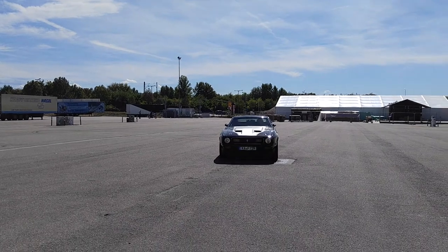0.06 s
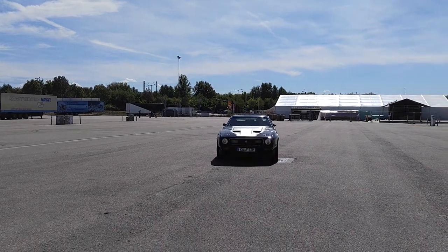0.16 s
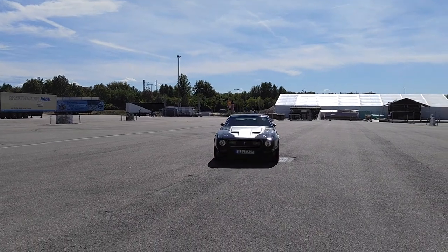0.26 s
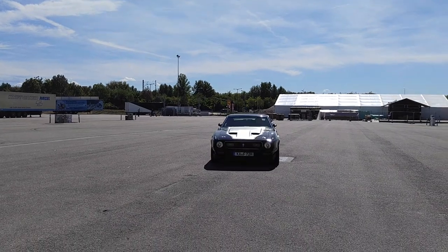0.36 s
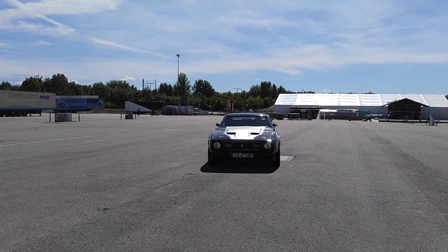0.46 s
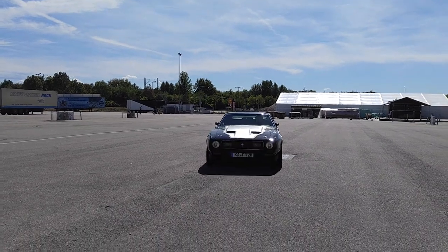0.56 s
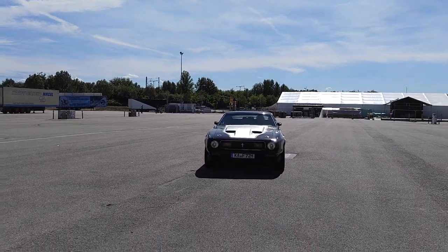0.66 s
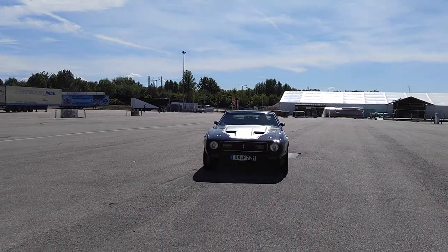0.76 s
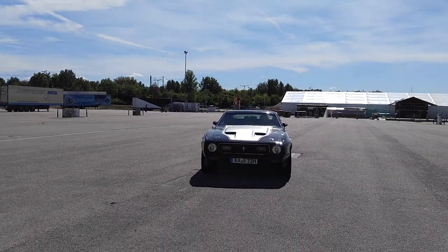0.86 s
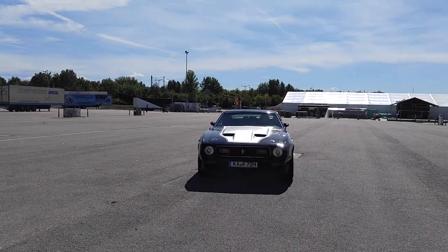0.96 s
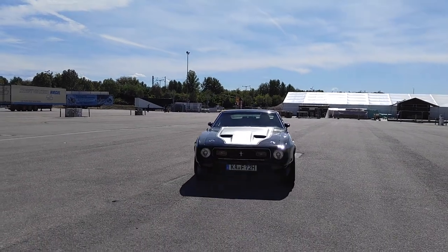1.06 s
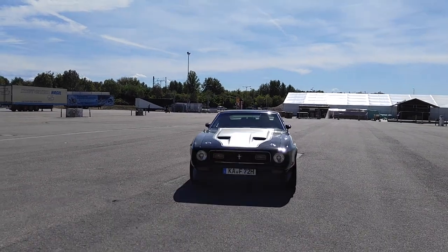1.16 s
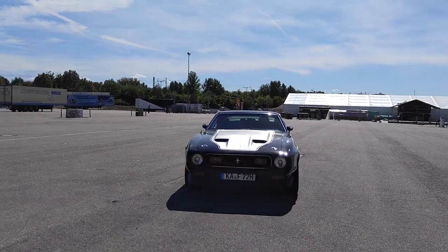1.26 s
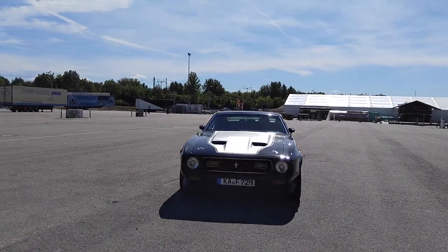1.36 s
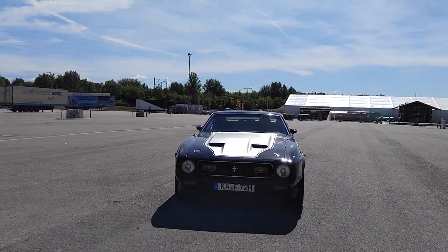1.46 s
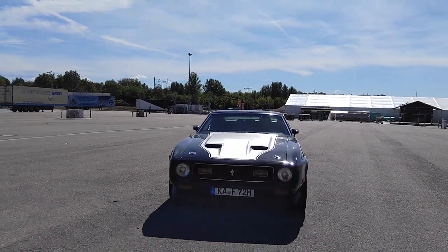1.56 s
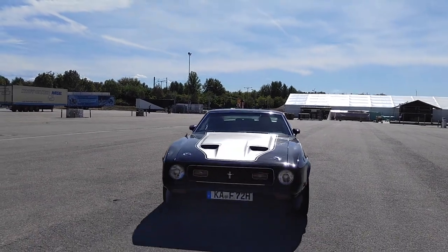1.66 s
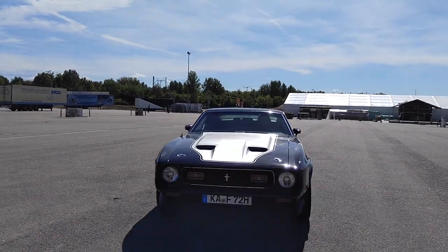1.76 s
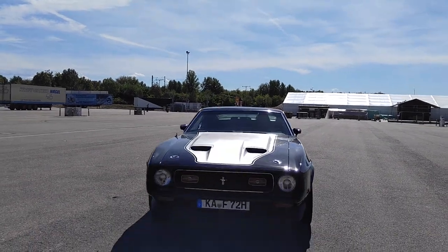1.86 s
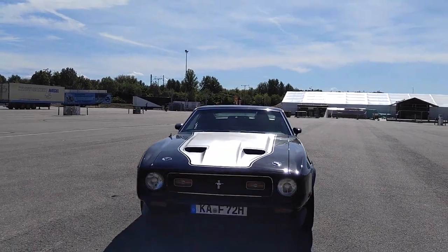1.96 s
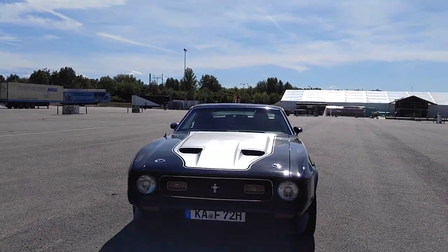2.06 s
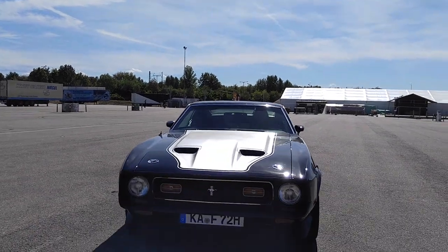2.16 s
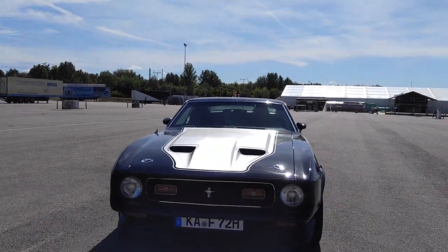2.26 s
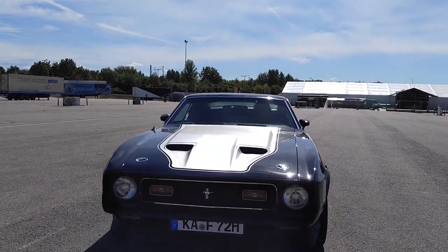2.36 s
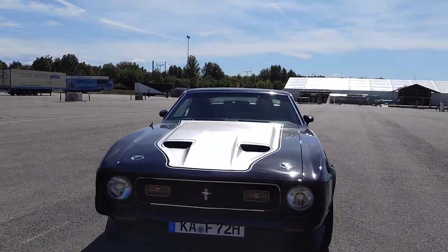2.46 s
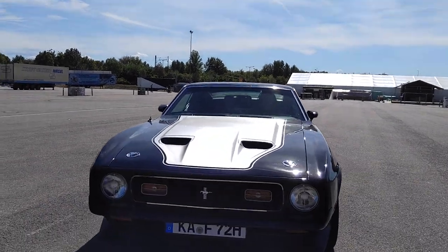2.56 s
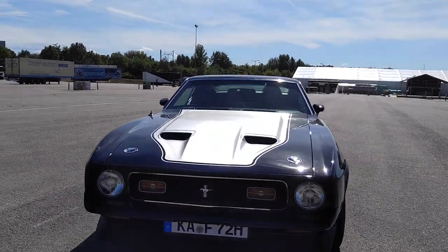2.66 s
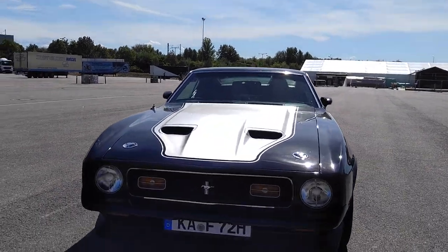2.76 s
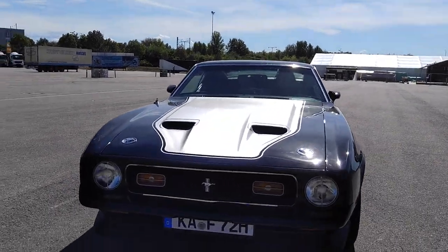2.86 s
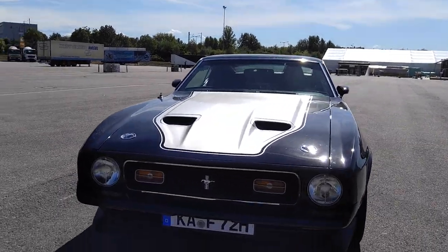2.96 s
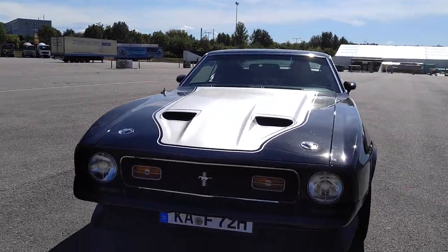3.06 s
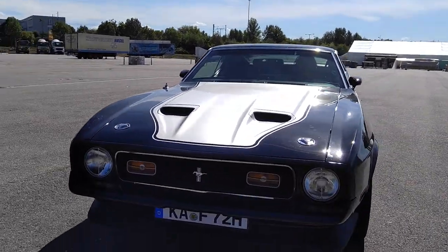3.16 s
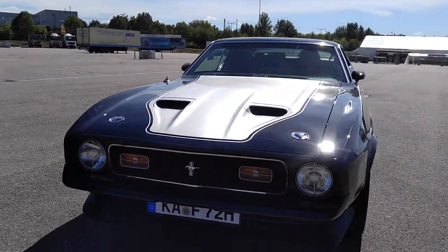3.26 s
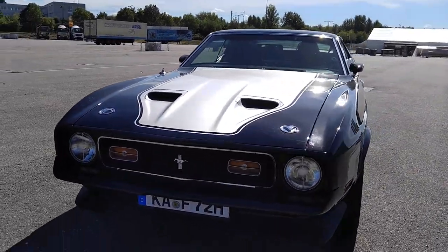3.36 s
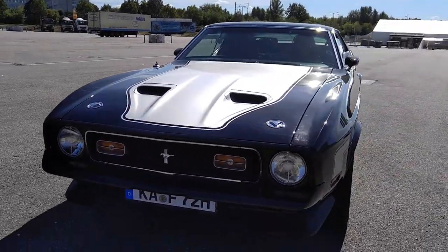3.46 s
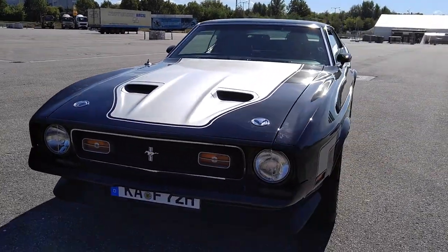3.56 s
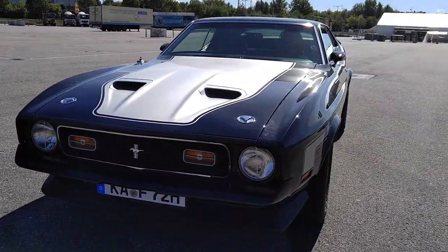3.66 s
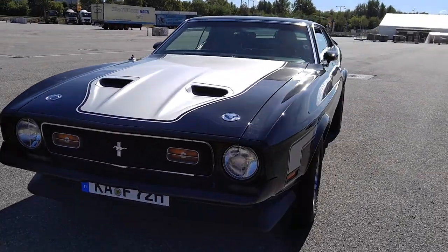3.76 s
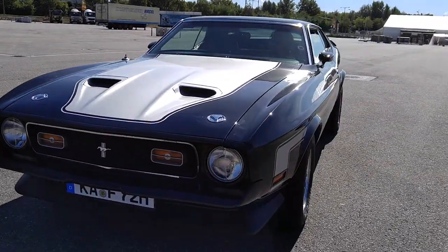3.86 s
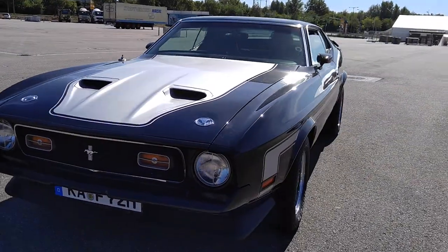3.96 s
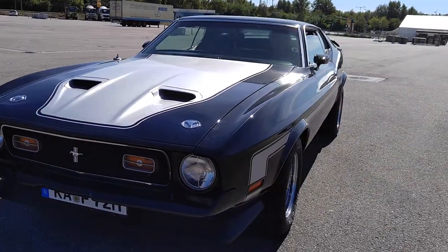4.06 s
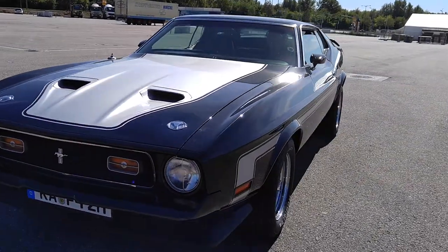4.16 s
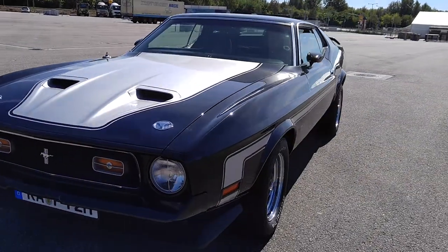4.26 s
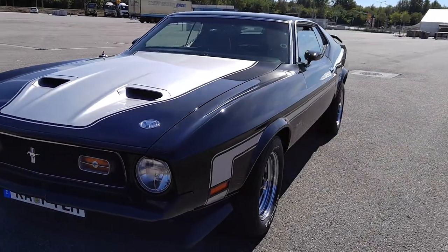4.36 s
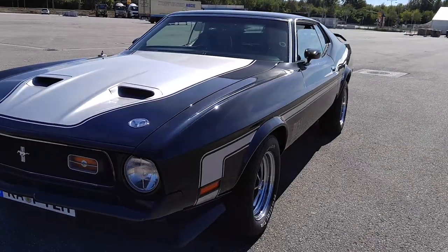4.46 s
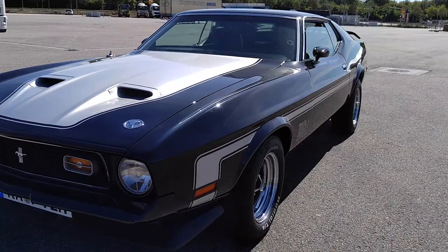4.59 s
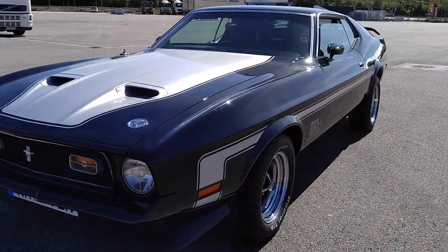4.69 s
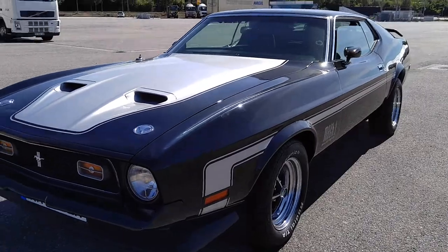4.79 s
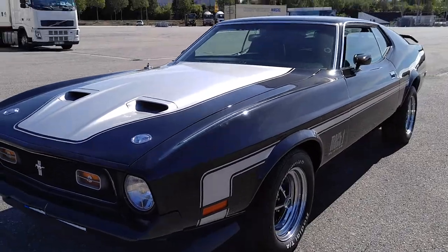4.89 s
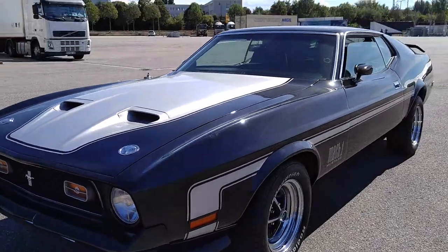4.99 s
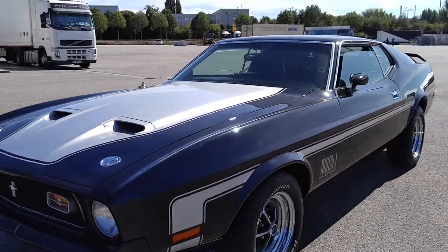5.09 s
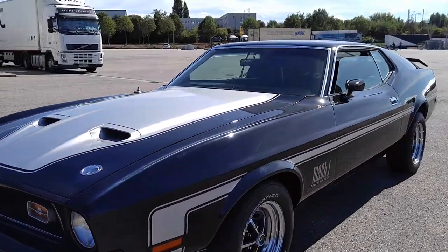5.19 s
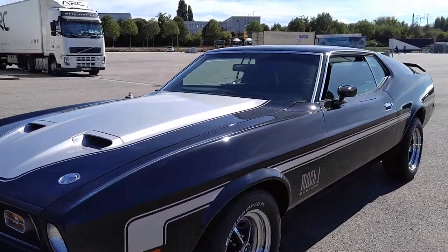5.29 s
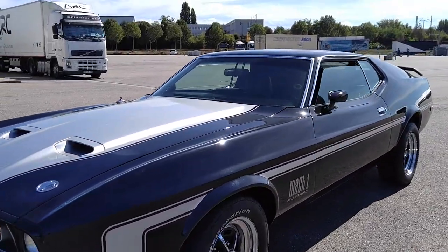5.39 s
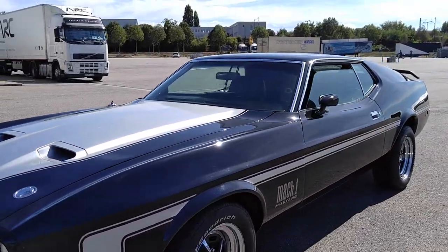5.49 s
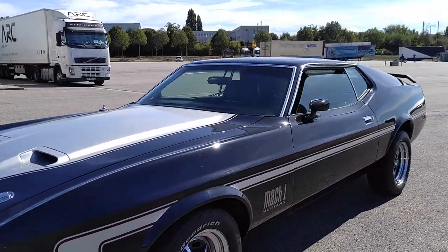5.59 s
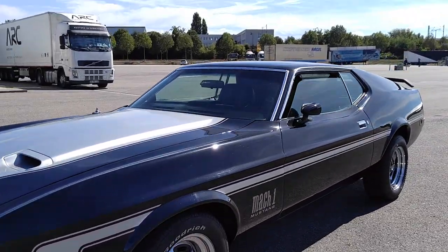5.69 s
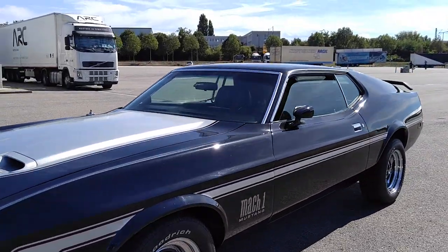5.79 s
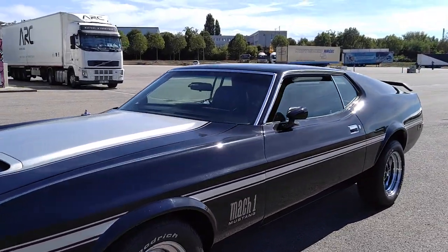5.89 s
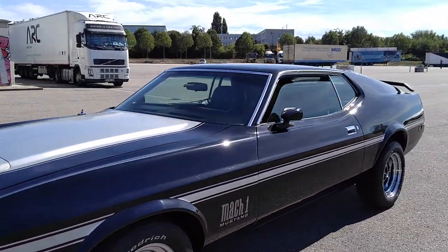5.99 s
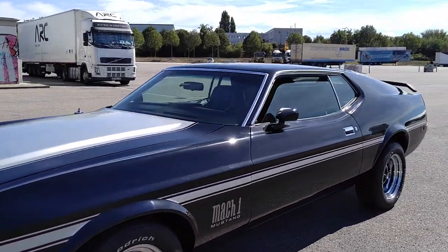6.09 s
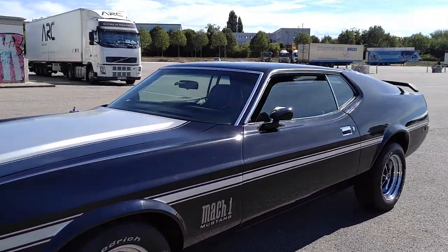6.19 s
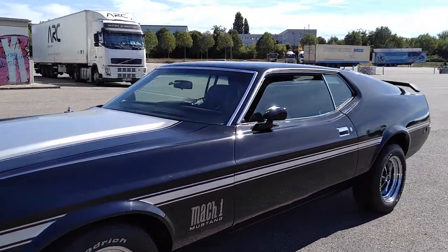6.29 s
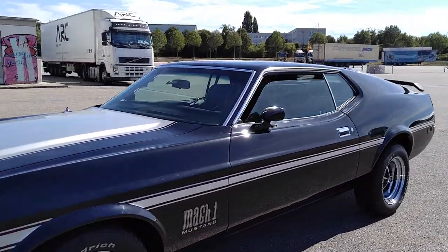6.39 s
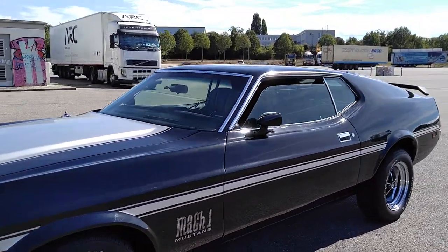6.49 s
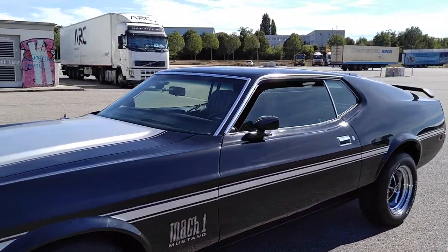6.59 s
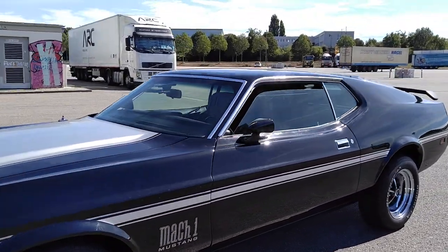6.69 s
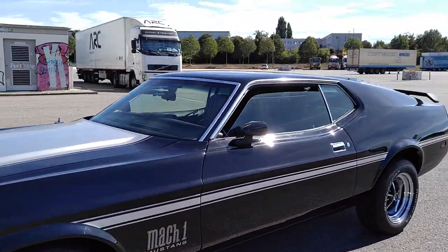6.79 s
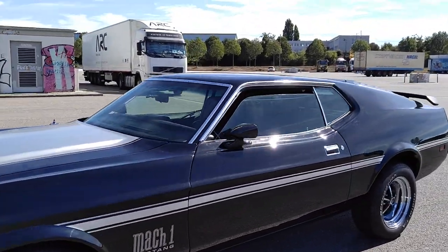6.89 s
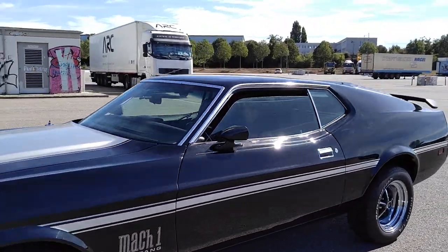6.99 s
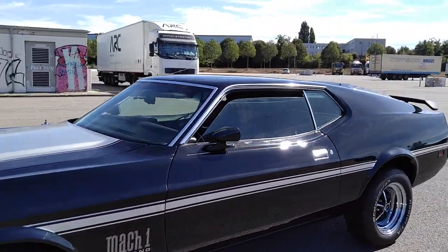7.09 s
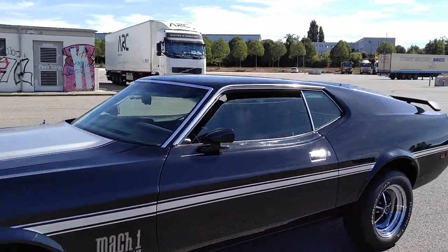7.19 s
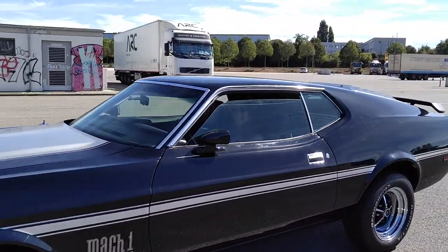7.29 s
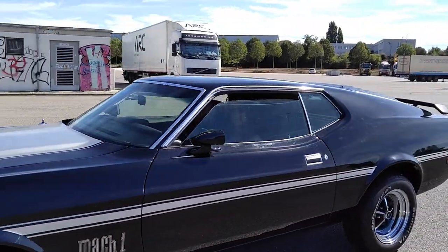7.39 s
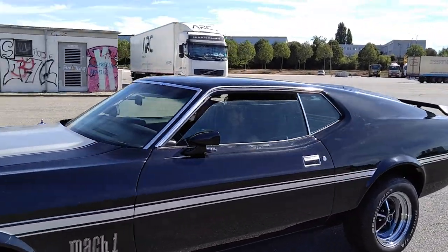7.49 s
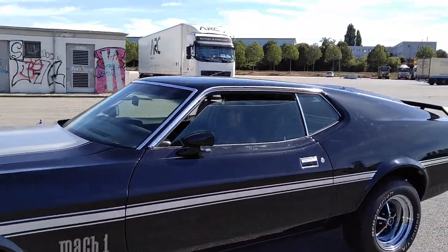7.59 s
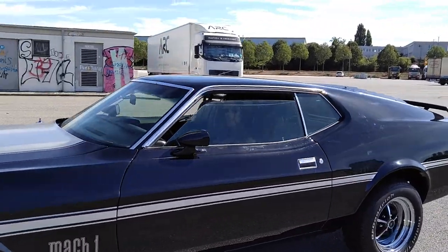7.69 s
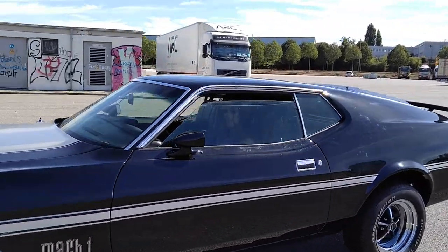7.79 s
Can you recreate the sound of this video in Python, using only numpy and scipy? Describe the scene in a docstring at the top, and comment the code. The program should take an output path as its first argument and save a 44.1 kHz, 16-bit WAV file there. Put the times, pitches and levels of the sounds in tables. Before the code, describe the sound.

An open car park, dry and wide, heard by a close-set stereo microphone. From 0 to 1 s a V8 car is still distant: a rough, breathy fan roar with small puffs, faint hiss, and a low hum around 120 Hz beating quickly. From 1 to 3 s the hum swells strongly into a deep, lumpy exhaust throb with soft bass thuds, while light wind buffets the microphone, strongest near 2.5 to 3.3 s and leaning left. Around 4 s the wind subsides and engine speed sags and recovers, the pulses loping more slowly. From 5 s the car is near and side-on: bright valve-train hiss, sharp knocks, buzzing loose panels and a thin heat shield ringing near 1.1 kHz, slightly left. A low hoot passes at 5.7 s. From 6 to 7.8 s knocks and high metallic chirps crowd in between brief lulls, over the fullest rumble, without stopping.

```python
"""An open car park, where a V8 car rolls up at idle to a two-port microphone and turns its side to it.
Uneven firings ring the modes of the exhaust pipe, with low engine orders thudding beneath.
The fan is a noise roar shaken by the firings; the valve train is hiss that jumps at each beat.
Loose panels and a heat shield ring as narrow noise resonances; brief chirps and a low hoot stand out.
Lumpy low noise is a light wind buffeting the ports."""
import sys
import numpy as np
from scipy import signal
from scipy.fft import rfft, irfft, next_fast_len
from scipy.io import wavfile
from scipy.ndimage import uniform_filter1d

SR = 44100
rng = np.random.default_rng(int(sys.argv[2]) if len(sys.argv) > 2 else 0)


def master(y):
    """Save y as 16-bit WAV."""
    cut = np.clip(np.atleast_2d(y).T, -1, 1)
    pcm = np.round(cut * 32767)  # scale
    wavfile.write(sys.argv[1], SR, pcm.astype(np.int16))


N = 345744
T = np.arange(N) / SR


def amp(db):
    """Decibels to linear gain."""
    return 10 ** (np.asarray(db) / 20)


def evened(x):
    """Scale to rms 1."""
    return x / np.sqrt(np.mean(x ** 2) + 1e-20)


def steadied(x, size):
    """A mode fed by steady flow holds its level: evens out swells longer than size samples."""
    return x / np.sqrt(uniform_filter1d(x ** 2, size=size) + 0.25)


def read(points, hz):
    """Spectrum table on a log-frequency axis."""
    table_hz, value = np.transpose(points)
    return np.interp(np.log(hz + 1), np.log(table_hz + 1), value)


def curves(rows, t=T):
    """Every column of a table against time."""
    s, *columns = np.transpose(rows)
    return [np.interp(t, s, column) for column in columns]


def resonate(x, hz, width):
    """Steep resonance of rms 1."""
    band = [hz - width / 2, hz + width / 2]
    return evened(signal.sosfilt(signal.butter(2, band, "band", fs=SR, output="sos"), x))


def clicks(turns):
    """Sample index of each whole turn."""
    return np.flatnonzero(np.diff(np.floor(turns)) > 0)


def marks(s, size):
    """One click of each size at the times s."""
    out = np.zeros(N)
    out[np.clip((np.asarray(s) * SR).astype(int), 0, N - 1)] = size
    return out


def dying(x, seconds):
    """Each click starts an exponential decay."""
    return signal.lfilter([1], [1, -np.exp(-1 / (seconds * SR))], x)


def bumps(s, size, length_s):
    """Smooth humps centred on the times s."""
    return signal.oaconvolve(marks(s, size), np.hanning(int(length_s * SR)) ** 2, "same")


def swells(rows, order=2):
    """Gain made of smooth humps, each of its own height and length."""
    gain = 0
    for s, db, length in rows:
        phase = np.clip((T - s) / length, -.5, .5)
        gain = gain + amp(db) * abs(np.cos(np.pi * phase)) ** order
    return gain


def wander(db, seconds):
    """Gain that drifts at random by about db, smoothed twice over the given seconds."""
    size = int(seconds * 1000)
    drift = rng.standard_normal(8000)  # one value a millisecond
    drift = uniform_filter1d(uniform_filter1d(drift, size), size)
    return amp(db * np.interp(T, np.arange(8000) / 1000, evened(drift)))


# How far the car has turned: start_s, side (0 front and far - 1 side and near)
SIDE_TURN = [(0, 0), (1.5, 0.41), (3.5, 0.86), (5.5, 0.96), (7.84, 1)]
# Likeness of the noise at the two ports: pitch_hz, likeness (0 unrelated - 1 identical)
PORT_LIKENESS = [(60, 0.69), (110, 0.82), (200, 0.87), (380, 0.95), (700, 0.88), (1290, 0.91), (2380, 0.41),
                 (4400, 0.21), (8120, 0.041), (15000, 0.58)]


def noise(far, near, patchy_db, streak_db=0, same=None, size=1024):
    """Two-port noise that blends from one spectrum to another as the view turns; overall rms 1."""
    hop = size // 4
    frames, hz = N // hop + 5, np.fft.rfftfreq(size, 1 / SR)
    a, b, c, d, patches, streaks = rng.standard_normal((frames, len(hz), 6)).T
    # thin resonances come and go; broader patches shift in level
    streaks = evened(uniform_filter1d(uniform_filter1d(streaks, size=2, axis=0), size=24, axis=1))
    patches = evened(uniform_filter1d(uniform_filter1d(patches, size=8, axis=0), size=8, axis=1))
    side = np.clip(curves(SIDE_TURN, np.arange(frames) * hop / SR)[0], 0, 1)
    shape = amp(read(far, hz)[:, None] * (1 - side) + read(near, hz)[:, None] * side)
    shape /= np.sqrt((shape ** 2).mean(0))
    alike = np.clip(read(PORT_LIKENESS, hz)[:, None] if same is None else same, -1, 1)
    left = a + 1j * b
    right = alike * left + np.sqrt(1 - alike ** 2) * (c + 1j * d)
    spectrum = np.array([left, right]) * shape * amp(patchy_db * patches + streak_db * streaks)
    return evened(signal.istft(spectrum, nperseg=size, noverlap=size - hop)[1][:, :N])


# Engine speed: start_s, beat_hz (valve beats, twice the crank speed)
ENGINE_SPEED = [(0.0, 33), (0.4, 31), (1.85, 32.5), (2.09, 27.8), (2.66, 34.5), (3.25, 34.5), (4.0, 33.5),
                (4.61, 25.6), (5.42, 29.3), (6.25, 30), (6.55, 26.4), (7.18, 26.6), (7.4, 31.7),
                (7.84, 24.1)]


def valve_beats():
    """Running count of valve beats as the idle speed rises and falls."""
    return np.cumsum(curves(ENGINE_SPEED)[0]) / SR


# Relative strength of each of the eight firings: level_db
FIRING_STRENGTH = [-6.5, 1, -11.5, -0.5, 2, -10, -5, 4.5]


def firings(beats):
    """One pulse a firing, two firings a valve beat, no two alike."""
    at = clicks(2 * beats)
    chance = rng.standard_normal((len(at), 2))
    pulses = np.zeros(N)
    late = (25 * abs(chance[:, 1])).astype(int)  # lazy burns arrive late (samples)
    strength_db = np.resize(FIRING_STRENGTH, len(at)) + 4.6 * chance[:, 0]
    pulses[np.minimum(at + late, N - 1)] = amp(strength_db)
    return pulses


# Mix as the car rolls closer and turns its side, relative levels:
# start_s, second_mode_db, steady_thud_db, fan_db, valve_train_db
ROLL_UP = [(0, -38.5, -27, -39.5, -58.5), (0.2, -43.5, -24, -37.5, -55.5), (0.45, -44.5, -35, -38, -58),
           (0.7, -44.5, -38, -38, -55.5), (1.2, -42, -49, -39.5, -53.5), (1.7, -42, -47, -42.5, -53),
           (2.3, -38.5, -26, -41.5, -50.5), (2.6, -37, -28.5, -40, -48), (3.3, -43.5, -52, -41.5, -49.5),
           (4.0, -34, -34, -40.5, -49), (4.7, -45, -28, -40, -48.5), (5.4, -38.5, -25, -41.5, -47),
           (5.9, -41, -22, -38.5, -43), (6.4, -38.5, -29, -41.5, -46), (7.0, -30, -21, -39.5, -43.5),
           (7.35, -31, -24, -38, -40), (7.84, -27.5, -22, -39, -43)]
# The low hum pulses, quick beating at first, slower loping surges later: centre_s, level_db, length_s
HUM_PULSES = [(0.11, -43, 0.079), (0.216, -36, 0.23), (0.533, -28.5, 0.065), (0.608, -36, 0.088),
              (0.704, -33, 0.065), (0.776, -32, 0.086), (0.9, -32.5, 0.17), (1.04, -32, 0.11),
              (1.144, -33, 0.095), (1.219, -24, 0.08), (1.3, -26.5, 0.069), (1.474, -28.5, 0.26),
              (1.564, -25, 0.072), (1.688, -24.5, 0.22), (1.851, -22, 0.069), (1.93, -27, 0.105),
              (2.028, -27.0, 0.068), (2.145, -21.5, 0.089), (2.226, -27.5, 0.089), (2.299, -28, 0.078),
              (2.36, -24.0, 0.054), (2.412, -20.5, 0.072), (2.475, -21.5, 0.075), (2.582, -17, 0.054),
              (2.661, -21, 0.12), (2.758, -22.5, 0.077), (2.836, -22.5, 0.1), (2.914, -18, 0.078),
              (2.996, -20.5, 0.045), (3.055, -23, 0.089), (3.182, -21.0, 0.17), (3.285, -20, 0.073),
              (3.355, -24, 0.071), (3.393, -29, 0.11), (3.491, -23.5, 0.069), (3.605, -20, 0.15),
              (3.754, -21, 0.18), (3.884, -20, 0.16), (4.022, -22, 0.1), (4.13, -19.5, 0.28),
              (4.309, -24.5, 0.099), (4.4, -23.5, 0.27), (4.589, -18.5, 0.16), (4.722, -26, 0.11),
              (4.879, -19.0, 0.23), (5.008, -23.5, 0.15), (5.154, -21.0, 0.17), (5.268, -20, 0.068),
              (5.449, -23, 0.15), (5.56, -21, 0.061), (5.619, -29, 0.062), (5.832, -19.5, 0.38),
              (6.015, -16.5, 0.067), (6.101, -24.0, 0.13), (6.18, -22, 0.075), (6.336, -22.0, 0.36),
              (6.552, -21, 0.089), (6.652, -20.5, 0.18), (6.85, -24.0, 0.2), (6.963, -20, 0.071),
              (7.034, -24.0, 0.059), (7.126, -19.5, 0.16), (7.315, -16.5, 0.22), (7.437, -19.5, 0.086),
              (7.515, -15, 0.072), (7.591, -17.5, 0.11), (7.689, -17.5, 0.085), (7.769, -18.5, 0.088)]
NOTE_HZ, HURRY_CYCLES = 116.3, .55  # a pulse's note: NOTE_HZ + HURRY_CYCLES / its length in seconds
TWIN_SHARE = 0.34  # a second pipe roughens the note


def lowest_mode(drive):
    """Gliding sine with uneven phase, plus a noisy second pipe, under the pulsing of the hum."""
    s, _, length = np.transpose(HUM_PULSES)
    note_hz = np.interp(T, s, NOTE_HZ + HURRY_CYCLES / length)
    waver = .038 * resonate(rng.standard_normal(N), 9, 12)  # uneven burns push its phase about (turns)
    tone = np.sqrt(2) * np.sin(2 * np.pi * (np.cumsum(note_hz) / SR + waver))
    twin = steadied(resonate(drive, 130.4, 12.46), size=5000)
    level = np.hypot(swells(HUM_PULSES, order=1), amp(-40.5))  # never quite silent
    return evened(tone + TWIN_SHARE * twin) * level


# The second pipe mode throbs: centre_s, level_db, length_s
SECOND_THROBS = [(2.727, -55, 0.077), (2.804, -41, 0.085), (2.9, -49, 0.088), (2.988, -36.5, 0.082),
                 (3.111, -45, 0.089), (3.277, -42, 0.08), (3.431, -41, 0.063), (3.541, -41, 0.073),
                 (3.601, -38, 0.11), (3.72, -36.0, 0.071), (3.937, -30.5, 0.09), (4.268, -44, 0.18),
                 (4.568, -41.0, 0.12), (4.768, -40.5, 0.58), (5.049, -42.5, 0.19), (5.154, -37.5, 0.12),
                 (5.261, -38, 0.16), (5.432, -36, 0.13), (5.54, -43, 0.079), (5.617, -38.5, 0.1),
                 (5.789, -42, 0.43), (5.993, -36.5, 0.13), (6.067, -41, 0.065), (6.227, -34.5, 0.43),
                 (6.404, -40, 0.21), (6.539, -38, 0.07), (6.85, -38, 0.13), (7.031, -33.5, 0.13),
                 (7.109, -43, 0.062), (7.303, -28, 0.061), (7.384, -35, 0.073), (7.475, -30.5, 0.13),
                 (7.644, -31, 0.27)]


def second_mode(drive):
    """Two close resonances of the gas flow throb together; also returns the part unlike at the ports."""
    throb = amp(curves(ROLL_UP)[0] - 4.5) * wander(2.26, 0.021) + swells(SECOND_THROBS)
    aside = 0.024 * throb * resonate(rng.standard_normal(N), 244.0, 24.0)
    pair = resonate(drive, 229.7, 15.0) + 0.35 * resonate(drive, 215.3, 9.1)
    return throb * steadied(pair, size=1200), aside


# Upper pipe modes, the broad one first: pitch_hz, width_hz
UPPER_MODES = [(350, 70), (468, 17), (585, 20), (705, 17)]
# Level of each upper mode, before its swell: far_db, near_db
UPPER_LEVELS = [(-53, -49.5), (-67, -53.5), (-73, -48), (-60, -48.5)]
# Upper modes swell, relative levels: start_s, broad_mode_db, three_thin_modes_db
UPPER_SWELLS = [(0, -5, 2.5), (2.1, 2.5, -3), (2.5, 7.5, -2), (3.4, -2, -2), (4.2, -11.5, -2),
                (5.2, 3.5, -1), (5.9, 3.5, 3), (6.4, 3.5, -3.5), (6.7, -13, -5), (7.1, 6, -5),
                (7.47, -11, -0.5), (7.84, -7, -1)]


def upper_modes(drive):
    """Higher pipe resonances of the gas flow, each wandering in level."""
    side = curves(SIDE_TURN)[0]
    broad_db, thin_db = curves(UPPER_SWELLS)
    out = np.zeros(N)
    for (hz, width), (far_db, near_db), swell_db in zip(UPPER_MODES, UPPER_LEVELS, [broad_db] + 3 * [thin_db]):
        level = amp(far_db + (near_db - far_db) * side + swell_db) * wander(3.14, 0.078)
        out += level * steadied(resonate(drive, hz, width), size=4000)
    return out


# Low engine orders, relative levels: beat_multiple, level_db
THUD_ORDERS = [(1, 4), (2, 2), (3, -2), (6, -15)]
# Low thuds, the deep notes swell briefly: centre_s, level_db, length_s
LOW_THUDS = [(0.619, -29, 0.085), (0.834, -23.5, 0.13), (1.003, -26, 0.27), (1.164, -29, 0.12),
             (1.596, -25, 0.35), (1.756, -29, 0.096), (1.933, -25, 0.15), (2.178, -26, 0.13),
             (2.307, -30, 0.22), (2.471, -25, 0.11), (2.659, -27, 0.18), (2.847, -27, 0.11),
             (2.989, -25, 0.086), (3.109, -27, 0.21), (3.33, -21, 0.11), (3.402, -24.5, 0.11),
             (3.559, -24, 0.12), (3.66, -30, 0.17), (3.794, -37, 0.13), (3.952, -24.5, 0.17),
             (4.184, -40, 0.072), (4.253, -36.0, 0.09), (4.457, -26, 0.19), (4.696, -21, 0.15),
             (4.79, -32, 0.1), (5.001, -32, 0.18), (5.286, -30, 0.35), (5.582, -28.5, 0.21),
             (5.85, -44, 0.21), (6.107, -49, 0.13), (6.192, -36, 0.099), (6.277, -35, 0.082),
             (6.355, -32, 0.11), (6.532, -30, 0.24), (6.781, -26, 0.34), (6.985, -34, 0.3),
             (7.252, -27, 0.18), (7.506, -36, 0.35), (7.803, -22, 0.16)]


def engine_thud(beats):
    """Sines at multiples of the valve beat, swelling briefly into low thuds."""
    stumble = .06 * resonate(rng.standard_normal(N), 4, 6)  # the crank hurries and hangs back (turns)
    orders = np.zeros(N)
    for multiple, db in THUD_ORDERS:
        orders += amp(db) * np.sin(2 * np.pi * (multiple * (beats + stumble) + rng.random()))
    return evened(np.sqrt(2) * orders) * (amp(curves(ROLL_UP)[1] - 10.5) + swells(LOW_THUDS))


def exhaust(beats, pulses):
    """Firing pulses and gas turbulence ring the pipe; the low engine orders stand out as a thud."""
    drive = evened(pulses - pulses.mean()) + 1.8 * rng.standard_normal(N)  # turbulence rides on the pulses
    second, aside = second_mode(drive)
    note = lowest_mode(drive) + second + upper_modes(drive) + engine_thud(beats)
    return np.array([note + aside, note - aside])


LULL_S, LULL_AT_S, LULL_WIDTH_S = .555, 7.17, 0.32  # spacing, centre of one lull, full width
LULL_FROM_S = 2.8  # lulls deepen from this time to the end
LULL_RATTLE_DB, LULL_FAN_DB = -7.5, -4.5  # change for a lull of full depth


def lulls():
    """0 to 1: the engine bay falls quiet for a moment at a steady pace, deeper towards the end."""
    s = LULL_AT_S + LULL_S * np.arange(-7, 2)
    depth = np.clip((s - LULL_FROM_S) / (T[-1] - LULL_FROM_S), 0, 1) ** 1.16
    return bumps(s, depth, LULL_WIDTH_S)


# Fan heard through the grille, relative spectrum: pitch_hz, density_db (per Hz)
FAN_FRONT = [(150, -49), (250, -20), (377, 1), (511, -63), (564, -13), (686, 1), (938, 4), (1120, -6),
             (1360, -4.5), (1710, -20.5), (2020, -24.5), (2600, -27), (3380, -70), (5720, -120)]
# Fan heard from the side, relative spectrum: pitch_hz, density_db (per Hz)
FAN_SIDE = [(150, -26), (250, -59), (356, 4), (516, -76), (581, -5.5), (771, -6.5), (1080, -7),
            (1360, -8.5), (2600, -28), (3380, -48), (5720, -120)]
# The roar swells briefly: start_s, rise_db (before smoothing)
ROAR_PUFFS = [(.082, 10), (0.142, 9), (.191, 5.5), (0.233, 3), (.314, 1), (.568, 6.5), (.7, 7.5),
              (1.009, 6), (2.47, 2), (2.549, 3), (2.63, 3.5), (4.64, 3), (5.27, 5), (6.32, 4), (7.46, 4)]
PUFF_S = 0.011  # decay after a quick rise
POP_HZ, POP_S, POP_DB = 870, 0.011, -7.5  # each swell starts with a dull pop: pitch, decay, trim


def fan(pulses):
    """Broad air roar from the engine bay, shaken by the firings."""
    shake = 7.2 + evened(signal.oaconvolve(pulses, np.exp(-T[:2000] / 0.037))[:N])
    s, db = np.transpose(ROAR_PUFFS)
    steady_db = curves(ROLL_UP)[2] + LULL_FAN_DB * lulls()
    level_db = steady_db + uniform_filter1d(dying(marks(s, db), PUFF_S), size=60)
    pop = np.exp(-T[:1500] / POP_S) * np.sin(2 * np.pi * POP_HZ * T[:1500])
    pops = amp(steady_db + POP_DB) * signal.oaconvolve(marks(s, amp(db)), pop)[:N]
    roar = noise(FAN_FRONT, FAN_SIDE, patchy_db=0.3, streak_db=2.5)
    return amp(level_db) * evened(shake) * roar + pops


def valve_db():
    """Relative level of the valve train, hushed in each lull."""
    return curves(ROLL_UP)[3] + LULL_RATTLE_DB * lulls()


# Valve-train hiss at the start, darker, relative spectrum: pitch_hz, density_db (per Hz)
VALVES_START = [(1060, -29), (2010, -9), (2500, -9.5), (3590, 0), (4110, -10.5), (4670, -14), (5490, -9.5),
                (7900, -12), (9050, -17), (10300, -23), (10800, -16), (11500, -22.5), (15700, -30)]
# Valve-train hiss at the end, brighter, relative spectrum: pitch_hz, density_db (per Hz)
VALVES_END = [(1060, -8), (1800, 1), (2040, -21), (2240, -16), (2450, 1.5), (3220, -4.5), (4000, 2),
              (5350, -1.5), (6830, 4), (8270, -2.5), (8970, -7), (11500, -3.5), (14500, -11.5),
              (15700, -15)]
# Sharp knocks as the engine rocks: start_s, knock_db (relative),
# low_panel_db, high_panel_db (both relative to the knock)
ROCKING_KNOCKS = [(4.028, -44, -22, -6), (4.3759, -43.5, -26, -4), (4.515, -42, -9, -18),
                  (4.75, -43.5, -3.5, -1), (4.9508, -39, -19, -10), (5.0222, -32.5, -17, -33),
                  (5.0933, -38, -16, -14), (5.2415, -47, -25, -1), (5.538, -35.5, -11, -5),
                  (5.609, -31, -19, -34), (5.7768, -39, -29, -5), (5.8758, -26.5, -17, -16),
                  (5.9476, -40, -1, -30), (6.0719, -38.5, -6, -3.5), (6.1347, -31, -10, -26),
                  (6.2686, -42.5, 1, 1), (6.3338, -35, -12, -20), (6.397, -30.5, -17, -29),
                  (6.478, -41, -24, -29), (6.635, -34, -17, -6), (6.714, -27, -21, -44),
                  (6.791, -30.5, -12, -15), (6.866, -30, -17, -15), (6.945, -44, -20, 3),
                  (7.012, -24, -14, -24), (7.085, -27.5, -11, -16), (7.2245, -40, -28, -4),
                  (7.2859, -25, -10.5, -31), (7.4147, -28, -18, -14), (7.547, -26.5, -9, -30),
                  (7.744, -33, -17, -7), (7.822, -27.5, -13, -29)]
TICK_LEAD_S, TICK_DB = 0.043, -26  # a finer tick runs ahead of each knock


def rattle(beats):
    """Valve-train hiss that jumps at each beat and each knock, then dies away."""
    at = clicks(beats)
    taps = np.zeros(N)
    taps[at] = amp(4.5 * np.clip(rng.standard_normal(len(at)), -2, 2))
    taps[at[::2]] *= amp(0.5)  # harder once in each crank turn
    beating = steadied(6.1 + dying(taps, 0.059), size=9000)
    s, db = np.transpose(ROCKING_KNOCKS)[:2]
    jolts = marks(s, amp(db - 16.0)) + marks(s - TICK_LEAD_S, amp(db + TICK_DB))
    hiss = noise(VALVES_START, VALVES_END, patchy_db=1.0, streak_db=2.0, size=256)
    edge = sum(resonate(rng.standard_normal(N), hz, 1600) for hz in (8000, 11300, 13800))
    crack = evened(edge) * uniform_filter1d(dying(jolts, 0.011), size=150)  # bright, alike at both ports
    steady = amp(valve_db()) * beating * wander(1.1, 0.017)
    knocked = uniform_filter1d(dying(jolts, 0.021), size=150)
    return hiss * np.hypot(steady, knocked) + amp(2.5) * crack


# Modes of the low panel, relative levels: pitch_hz, level_db, width_hz
LOW_PANEL = [(1880, -4, 41.2), (2380, -7.5, 64), (2521, -9, 49.2), (3770, -2.5, 49.8), (4102, -2, 74),
             (4570, -4.5, 15), (5070, -2.5, 57)]
# Modes of the high panel, relative levels: pitch_hz, level_db, width_hz
HIGH_PANEL = [(5900, -4, 250), (6280, 0, 200), (6600, -1, 250), (6930, 0, 160), (8100, -4, 350),
              (11300, -6, 350)]


def sheet_metal(beats):
    """Two loose panels buzz in their modes: after each knock, and unevenly after the valve beats."""
    s, db, low_db, high_db = np.transpose(ROCKING_KNOCKS)
    at, out = clicks(beats), np.zeros((2, N))
    beat_kick = amp(valve_db()[at] - 23.5)
    for modes, panel_db in ((LOW_PANEL, low_db), (HIGH_PANEL, high_db)):
        for hz, mode_db, width in modes:
            kicks = np.zeros(N)
            kicks[at] = beat_kick * amp(5.0 * np.clip(rng.standard_normal(len(at)), -2, 1.5))
            knock_db = db + panel_db - 7.5 + 2.0 * rng.standard_normal(len(s))
            kicks[(s * SR).astype(int)] += amp(knock_db)
            buzz = uniform_filter1d(dying(kicks, 0.04), size=150)
            out += amp(mode_db) * buzz * resonate(rng.standard_normal((2, N)), hz, width)
    return out


# Wind strength and balance, relative levels: start_s, level_db, left_minus_right_db
WIND_LEVEL = [(0.0, -56, -3), (0.4, -46.5, -2), (0.87, -43, -5.5), (2, -40, 2), (2.6, -36.5, 3.5),
              (3.27, -38, 11), (3.7, -43.5, 6), (3.95, -38, 5), (4.2, -44, -5), (5.1, -57.5, -4),
              (7.84, -67, 6)]
# Colour of the buffeting, relative spectrum: pitch_hz, density_db (per Hz)
WIND_COLOUR = [(20, -43), (35, 3), (60, -0.5), (100, 0.5), (150, -8), (200, -13.5), (300, -24), (500, -43),
               (900, -120)]


def wind():
    """Lumpy low buffeting, harder now at one port, now at the other."""
    lumps = uniform_filter1d(uniform_filter1d(rng.standard_normal((2, N)), size=2000), size=2000)
    db, lean_db = curves(WIND_LEVEL)
    level_db = db + 11.5 + 2.3 * evened(lumps) + lean_db * [[.5], [-.5]]
    return amp(level_db) * noise(WIND_COLOUR, WIND_COLOUR, patchy_db=2.0, same=0.3, size=2048)


# Close modes of the heat shield, relative levels: pitch_hz, width_hz, level_db
SHIELD_TONES = [(1107, 11.3, 7.5), (1140, 20, 0), (1075, 23, -10)]
# The heat shield is jolted into singing, relative levels: start_s, level_db
SHIELD_JOLTS = [(2.5, -46), (3.15, -48), (3.95, -41), (4.07, -53), (5.1, -36.5), (5.399, -35), (5.779, -44),
                (5.9, -40), (5.96, -40), (6.2, -30), (6.3, -41), (6.41, -39), (6.49, -47), (6.722, -27.5),
                (6.8, -39), (6.87, -50), (7.089, -28), (7.14, -42), (7.29, -32.5), (7.37, -39), (7.56, -43)]
RING_RISE_S, RING_FADE_S = 0.0029, 0.045
MURMUR_DB = -51  # steady murmur, relative level


def shield():
    """Each jolt sets a few close thin-metal modes singing over a steady murmur that fades in."""
    shake = rng.standard_normal(N)
    ring = evened(sum(amp(db) * steadied(resonate(shake, hz, width), size=5000)
                      for hz, width, db in SHIELD_TONES))
    s, db = np.transpose(SHIELD_JOLTS)
    jolts = marks(s, amp(db))
    sing = dying(jolts, RING_FADE_S) - dying(jolts, RING_RISE_S)
    sing = uniform_filter1d(sing, size=1200, origin=300)  # holds a while
    murmur = amp(MURMUR_DB) * np.clip((T - 2.4) / 0.22, 0, 1)
    return ring * wander(1.6, 0.0069) * (sing + murmur)


# Brief ringing tones, mostly high metallic chirps, and one low hoot near 466 Hz, relative levels:
# start_s, pitch_hz, level_db, length_s
BRIEF_TONES = [(2.403, 4130, -49, 0.041), (2.969, 6150, -49, 0.051), (3.351, 4070, -50, 0.073),
               (3.567, 6460, -47.5, 0.06), (3.641, 4080, -48, .05), (3.938, 4100, -50, 0.052),
               (4.2, 4130, -60, .05), (4.49, 4090, -53, 0.052), (4.6, 4120, -57, .05),
               (4.751, 4130, -53, 0.14), (5.027, 3780, -60, 0.064), (5.087, 6270, -50, .07),
               (5.616, 4170, -43.5, 0.087), (5.71, 466, -40, 0.16), (5.881, 3790, -45, 0.12),
               (5.877, 7040, -41, 0.045), (6.161, 4100, -43, 0.08), (6.325, 6430, -41, 0.054),
               (6.447, 4090, -46, 0.051), (5.378, 4960, -49, 0.11), (5.888, 2370, -46, 0.062),
               (6.473, 3547, -47, 0.048), (7.055, 2450, -46, 0.048), (7.09, 5020, -47, 0.078),
               (7.307, 2380, -45, 0.11), (7.017, 4090, -39.5, 0.083), (7.224, 6810, -37, 0.03),
               (7.29, 3790, -52, .08), (7.545, 4180, -40, 0.044), (7.821, 4170, -36, 0.053),
               (7.819, 4960, -38, 0.057)]
TONE_WIDTH = 0.036  # bandwidth as a share of the pitch


def brief_tones():
    """Each a short fuzzy tone of resonant noise, quick to start, slower to fade."""
    out = np.zeros((2, N + SR))
    for s, hz, db, length in BRIEF_TONES:
        u = np.linspace(0, 1, int(length * SR))
        shake = rng.standard_normal(8000) + 0.61 * rng.standard_normal((2, 8000))  # shared + per port
        tone = resonate(shake, hz, TONE_WIDTH * hz)
        tone = tone / np.sqrt(uniform_filter1d(tone ** 2, size=600) + 1.04)
        envelope = amp(db) * np.sin(np.pi * u ** 0.55)
        out[:, int(s * SR):][:, :len(u)] += envelope * tone[:, -len(u):]
    return out[:, :N]


def scene():
    """One engine speed paces the firings, thud and valve beats; shield and chirps have their own times."""
    beats = valve_beats()
    pulses = firings(beats)
    car = exhaust(beats, pulses) + fan(pulses) + rattle(beats) + sheet_metal(beats) + brief_tones()
    return car + shield() * amp([[1.5], [-1.5]]) + wind()  # the shield leans left


# Balance of the two ports: pitch_hz, left_minus_right_db
PORT_LEAN = [(60, 0), (330, 0.5), (640, 2), (1410, 2), (3100, -2.5), (6820, 0), (15000, -1)]
BASS_HZ, BASS_ORDER = 48, 5  # bass roll-off
EDGE_HZ = 15800  # upper band limit


def record(dry):
    """The two ports lean differently by frequency and lose the deep bass; then the band limit."""
    size = next_fast_len(N + 4096)
    hz = np.fft.rfftfreq(size, 1 / SR)
    lean = amp(read(PORT_LEAN, hz) / 2)
    bass = 1 / np.hypot(1, (BASS_HZ / (hz + 1)) ** BASS_ORDER)
    ports = irfft(rfft(dry, size) * bass * [lean, 1 / lean], size)[:, :N]
    low_pass = signal.firwin(1023, EDGE_HZ, window=("kaiser", 9), fs=SR)
    return signal.oaconvolve(ports, low_pass[None], "same")


dry = scene()
out = record(dry)
master(out)
```